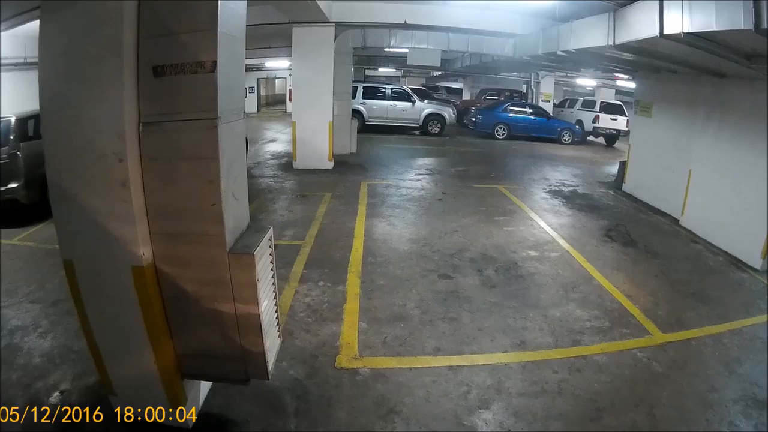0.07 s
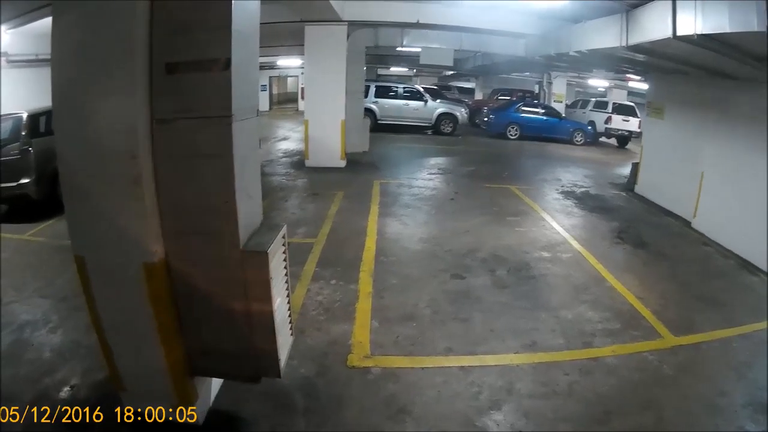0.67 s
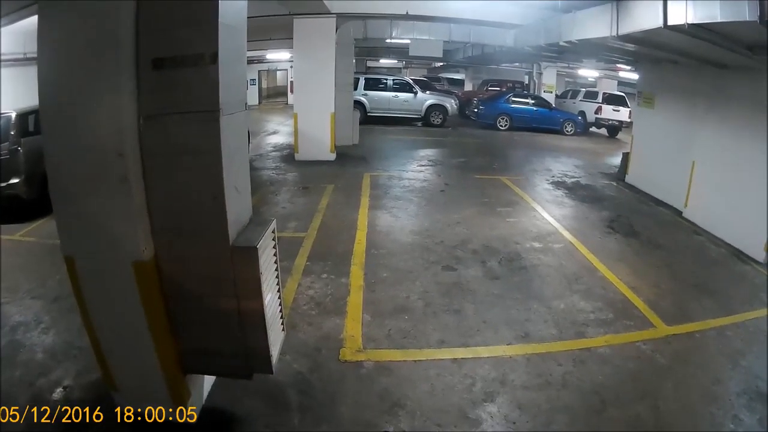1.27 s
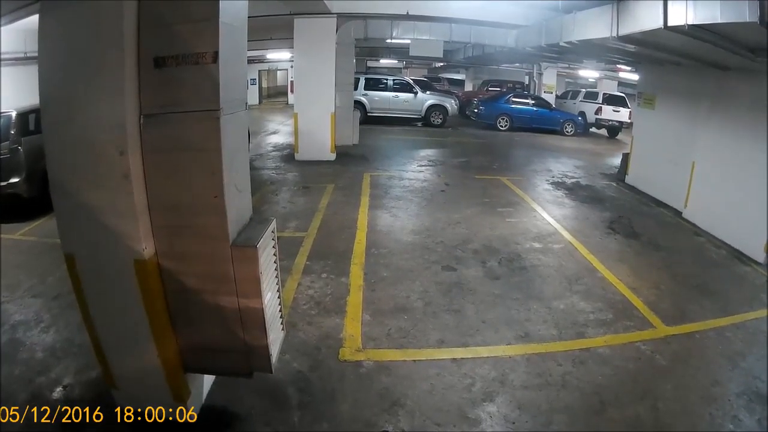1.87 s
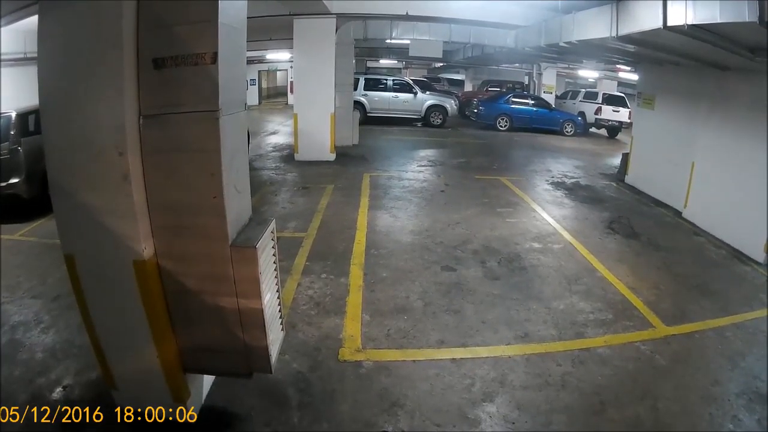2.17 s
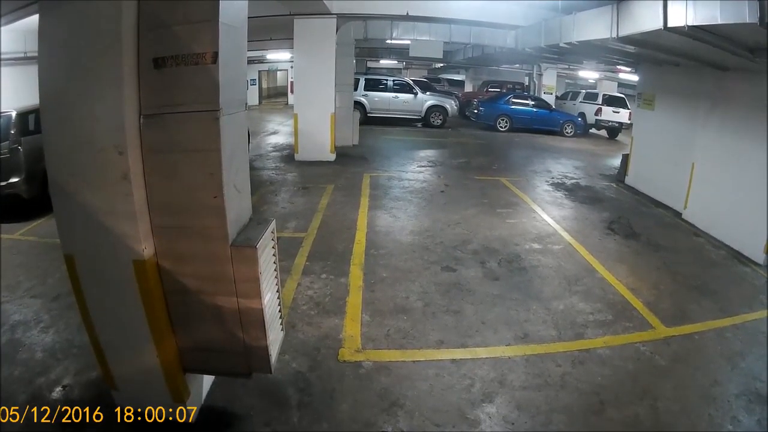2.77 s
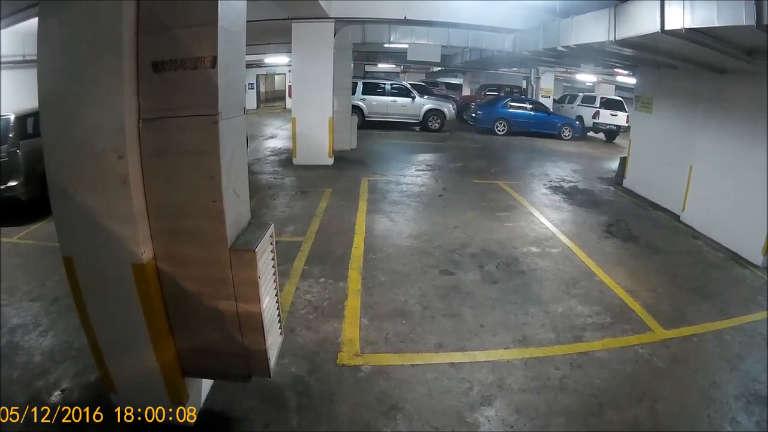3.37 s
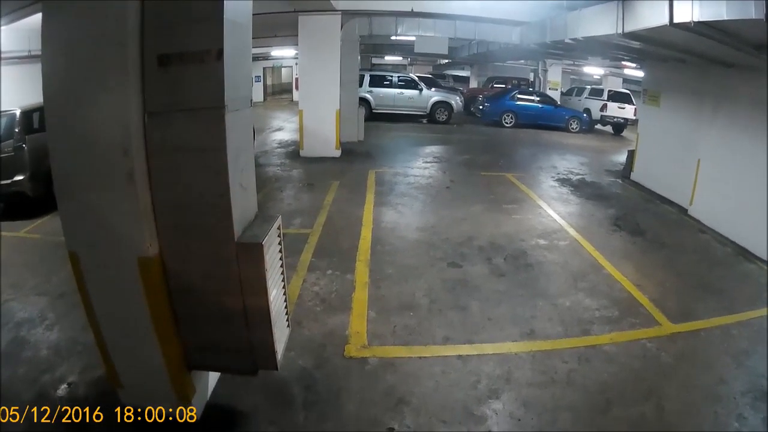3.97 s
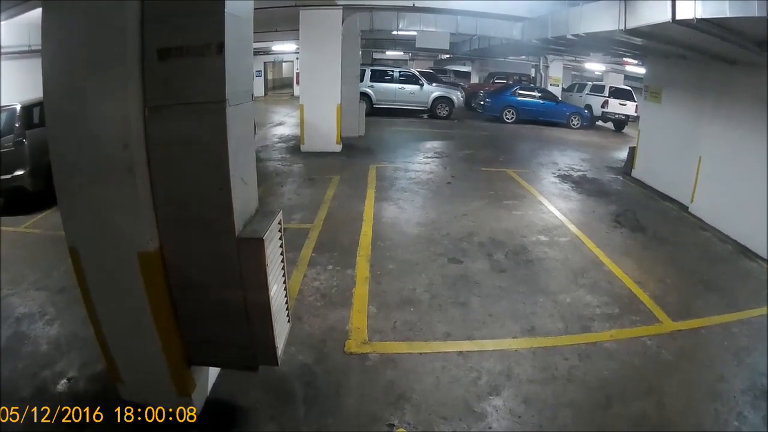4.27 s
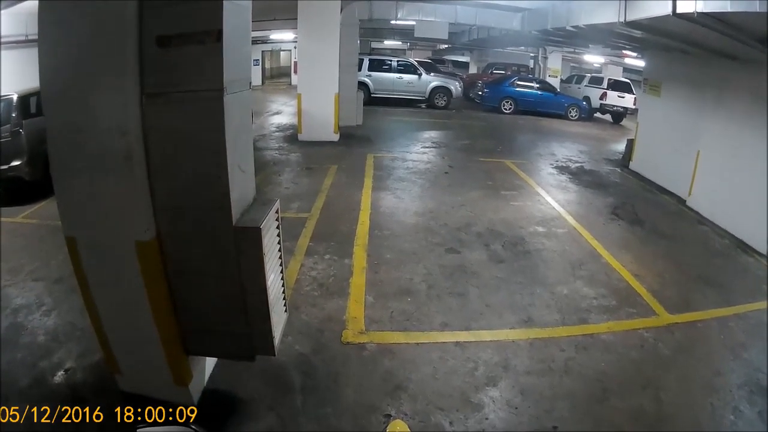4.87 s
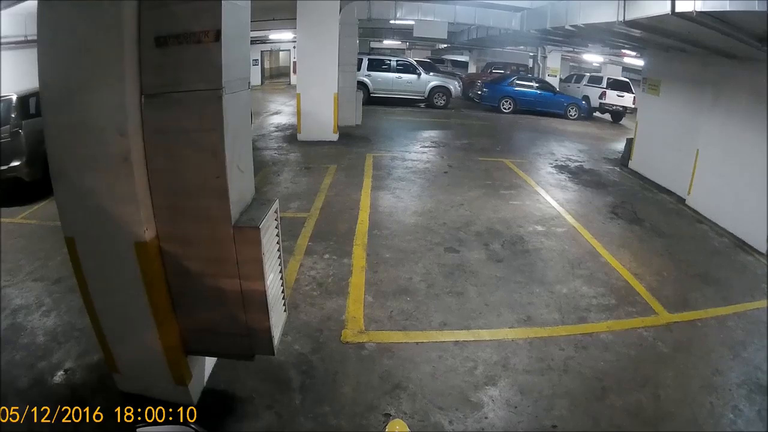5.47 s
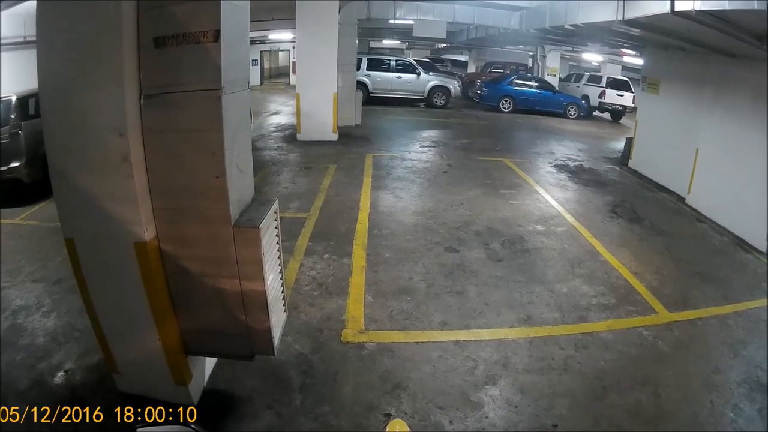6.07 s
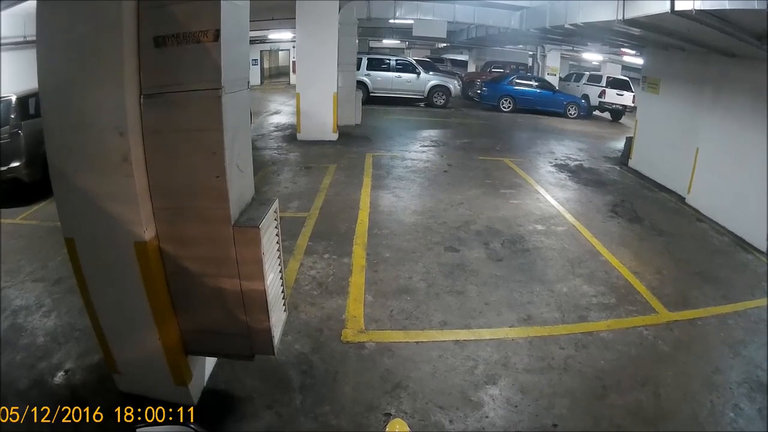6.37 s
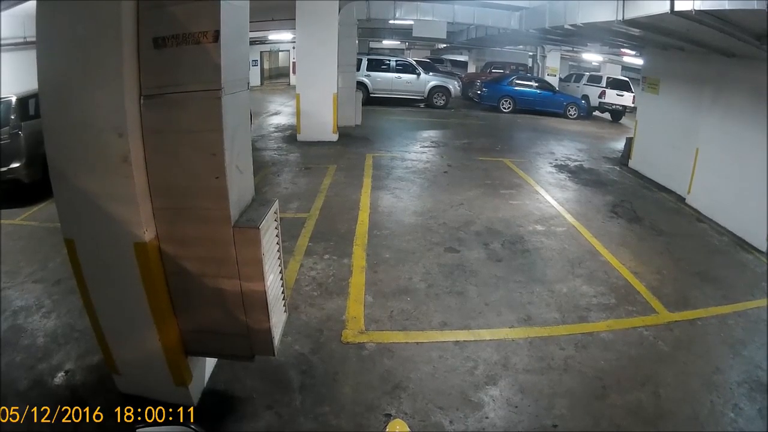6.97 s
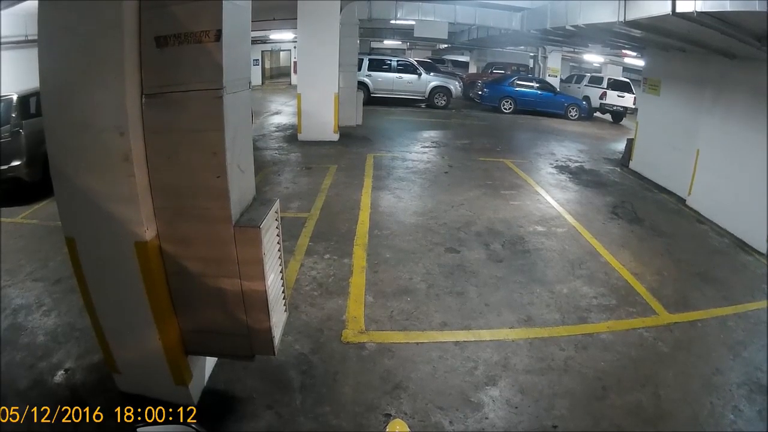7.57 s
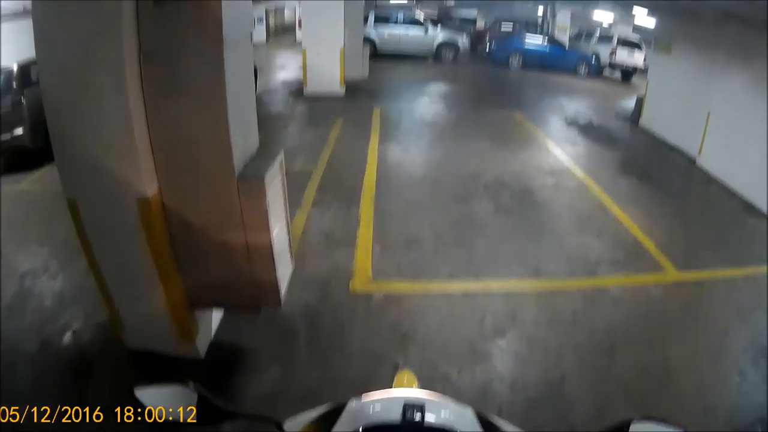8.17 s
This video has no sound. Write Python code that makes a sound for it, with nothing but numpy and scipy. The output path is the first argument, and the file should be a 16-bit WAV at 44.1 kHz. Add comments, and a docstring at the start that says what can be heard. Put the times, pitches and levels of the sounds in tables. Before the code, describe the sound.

A single-cylinder motorcycle runs close to the microphone in a concrete parking garage. Its low thudding slows to an uneven idle, rises in a gentle rev with a raspy bark, then drops back with a soft boom. After more idling, a second, longer rev builds and eases off. Gears whirr and valves chatter faintly, while the long echo smears everything into a rumble.

```python
"""A thudding single-cylinder motorcycle slows to an idle, then is gently revved twice in a concrete garage.
Each firing (one burst of burning fuel) rings the exhaust pipe with a thump and a raspy puff of gas.
The pipe barks and snarls while the throttle is open, and booms after it shuts.
Gears whirr, valves chatter, and a hollow rushing swells three times while the engine lags.
The garage's echo smears the engine into a rumble."""
import sys
import numpy as np
from scipy import signal
from scipy.fft import rfft, irfft
from scipy.io import wavfile

SR = 44100
rng = np.random.default_rng(int(sys.argv[2]) if len(sys.argv) > 2 else 0)


def waveform_to_disk(signal):
    """Save audio, clipped to [-1, 1], as 16-bit WAV at the path in sys.argv[1]."""
    frames = np.transpose(np.atleast_2d(signal))
    scaled = np.clip(frames, -1, 1) * 32767
    samples = np.round(scaled).astype(np.int16)
    wavfile.write(sys.argv[1], SR, samples)


N = 362943
TIME = np.arange(N) / SR


def gain_of(db):
    """Turns decibels (dB) into a number to multiply by."""
    return 10 ** (np.asarray(db) / 20)


def at_pitch(rows, hz):
    """Looks up a pitch in a table, sliding between its rows."""
    pitches, values = np.transpose(rows)
    return np.interp(np.log(hz + 1), np.log(pitches), values)


def coloured(noise, tone):
    """Shapes noise with a tone table, then sets its average strength (rms) to 1."""
    hz = np.fft.rfftfreq(N, 1 / SR)
    shaped = irfft(rfft(noise) * gain_of(at_pitch(tone, hz)), N)
    return shaped / np.sqrt(np.mean(shaped ** 2) + 1e-20)


def clicks(times, db):
    """One click at each of the times, in seconds."""
    out = np.zeros(N)
    out[np.clip(np.round(times * SR).astype(int), 0, N - 1)] = gain_of(db)
    return out


# The background's tone. Each row: pitch in Hz, relative level in dB.
BACKGROUND_TONE = [(20, 30.5), (45, 41.5), (100, 33.5), (300, 35.5), (800, 33.5), (1500, 6), (3000, -1),
                   (15000, -3)]
def background(level_db=-47):
    """A faint, steady low rumble and a thin hiss."""
    return gain_of(level_db) * coloured(rng.standard_normal(N), BACKGROUND_TONE)


# How long the echo lasts. Each row: pitch in Hz, seconds to fade by 60 dB.
ECHO_FADE = [(80, 3), (250, 2.5), (450, 3), (800, 3), (3000, 4)]
# How strong the echo is. Each row: pitch in Hz, level in dB.
ECHO_TONE = [(50, -3), (95, -4), (150, 3), (185, 0.5), (240, 1), (300, -3), (400, 2.5), (600, 1),
             (1000, -3.5)]
# Notes that ring between floor, ceiling and walls. Each row: pitch in Hz, width in Hz, level in dB.
# A narrower note rings longer.
ROOM_NOTES = [(79, 7.4, -8), (88.04, 5.6, -.5), (96.5, 3.6, -5.5), (110.1, 2.4, 0), (117.4, 2.4, 0),
              (123.8, 4.9, 1.5), (151.7, 10, 8), (163.6, 1.1, 4), (190, 2.5, -4.5), (217, 35, -0.5),
              (228.1, 25, -5), (250.7, 5.3, 5.5), (256.2, 2.4, 4), (329, 1.1, 4.5), (342.9, 9.5, 4),
              (383.3, 24, 4.5), (391.1, 5.8, 4.5), (473.2, 4, 9), (543, 2.3, 6), (771, 24, 4)]
def garage(sound, build_s=0.0084):
    """Sound bounces off the concrete and returns as a dense echo with ringing notes."""
    hz, t, bands = signal.stft(rng.standard_normal(2 * SR), SR, nperseg=2048)
    decay = np.log(1000) / at_pitch(ECHO_FADE, hz)[:, None]
    strength = gain_of(at_pitch(ECHO_TONE, hz))[:, None] * np.sqrt(2 * decay / SR)
    echo = signal.istft(bands * strength * np.exp(-decay * t), SR, nperseg=2048)[1][:2 * SR]
    age = TIME[:2 * SR]
    for note_hz, width, db in ROOM_NOTES:
        wave = np.exp(-np.pi * width * age) * np.sin(2 * np.pi * note_hz * age)
        echo += gain_of(db) * 2 * np.pi * width / SR * wave
    echo *= 1 - np.exp(-(age / build_s) ** 2)  # reflections take a moment to gather
    lead_in = sound[:SR // 8][::-1]  # so the garage is already ringing at the start
    return signal.oaconvolve(np.concatenate([lead_in, sound]), echo)[len(lead_in):][:N]


# Swells of rushing. Each row: stop in seconds, seconds taken to grow by swell_db, level it heads for in dB.
RUSHES = [(0.9, 0.83, -43), (3.988, 0.11, -38), (5.064, .8, -34)]
# Their tone. Each row: pitch in Hz, relative level in dB.
RUSH_TONE = [(130, -33), (180, 9.5), (250, -6), (340, 1), (430, -13.5), (575, 1), (680, -9), (790, -0.5),
             (920, -11.5), (1100, -17.5), (1400, -28.5), (2250, -34), (2800, -47), (4500, -65.5)]
def rush(swell_db=16.5, stop_s=0.016):
    """A hollow noise that swells and stops without an echo."""
    level = np.zeros(N)
    for stop, length, db in RUSHES:
        time_left = np.maximum(stop - TIME, 0)
        level += gain_of(db - swell_db * time_left / length) * np.minimum(time_left / stop_s, 1)
    return level * coloured(rng.standard_normal(N), RUSH_TONE)


# The engine's speed. Each row: time in seconds, firings per second.
ENGINE_SPEED = [(0.0, 20.49), (0.17, 19.41), (0.32, 13.09), (0.66, 14.68), (0.86, 8.03), (1.26, 8.97),
                (1.67, 15.15), (1.93, 14.42), (2.22, 16.76), (2.88, 26.16), (3.01, 21.25), (3.78, 8.73),
                (3.91, 9.26), (4.06, 7.27), (4.51, 9.27), (4.98, 8.04), (5.22, 9.66), (5.69, 15.13),
                (5.89, 14.42), (6.55, 15.84), (6.69, 14.35), (6.96, 17.1), (7.16, 16.52), (7.8, 24.11),
                (7.93, 18.85), (8.23, 14.73)]
def firing_rate(times):
    """Firings per second at the given times."""
    return np.interp(times, *np.transpose(ENGINE_SPEED))


def octaves(times, cruise_per_s=15):
    """Engine speed in octaves: 0 is cruising, 1 is twice as fast, -1 is half as fast."""
    return np.log2(firing_rate(times) / cruise_per_s)


def firings(lead_s=0.00815):
    """The times when the exhaust valve opens, just before each engine cycle ends."""
    cycles = np.floor(np.cumsum(firing_rate(TIME)) / SR)
    return TIME[np.diff(cycles, prepend=-1) > 0] - lead_s


# The tones of the gears and of the valves. Each row: pitch in Hz, relative level in dB.
GEAR_TONE = [(120, -34.5), (300, 4.5), (450, -10), (580, -3.5), (680, -2), (780, 5), (900, -1), (1020, -12),
             (1250, -18), (1550, -29.5), (2500, -48.5)]
VALVE_TONE = [(600, -24.5), (1200, -5), (1550, -1), (2200, 0), (2700, -18), (3200, -14.5), (4500, -44)]
# Louder moments. Each row: middle in seconds, half length in seconds, dB added to the valves.
CHATTERS = [(0.037, .15, 0), (2.348, .2, 7.5), (2.95, 0.21, 2), (6.525, 0.2, 7), (7.235, 0.25, 11),
            (7.888, 0.17, 4)]
def gears_and_valves(times, gears_db=-45.5, valves_db=-73, gear_share=0.38, rattle=1.3, rattle_s=.016):
    """Gears whirr and valves chatter, louder with speed; each firing jolts the loose parts."""
    knocks = clicks(times, 2 * np.clip(rng.standard_normal(len(times)), -2, 2))
    jolts = signal.oaconvolve(knocks, np.exp(-TIME[:SR // 8] / rattle_s))[:N]
    gear_noise, valve_noise = (1 + rattle * jolts) * rng.standard_normal((2, N))
    speed = octaves(TIME)
    swell_db = sum(db * np.exp(-((TIME - middle) / half) ** 2) for middle, half, db in CHATTERS)
    whirr = gain_of(gears_db + 5 * speed + gear_share * swell_db) * coloured(gear_noise, GEAR_TONE)
    chatter = gain_of(valves_db + 4 * speed + swell_db) * coloured(valve_noise, VALVE_TONE)
    return whirr + chatter


# Twists of the throttle. Each row: opens in seconds, shuts in seconds, added bark in dB,
# added bite (which lifts rasp, howl and snarl), boom level in dB, share by which the thump's pitch rises.
TWISTS = [(-.3, 0.093, 1, 5, -31, .25), (1.901, 2.815, 5, 3.5, -23, 0.46),
          (5.304, 7.775, 2.5, 2.5, -22, 0.19)]
SHUT_S = 0.04
def throttle(times, part, bend=1.1):
    """The added "bark" or "bite": each twist opens gradually, then snaps shut."""
    column = {"bark": 2, "bite": 3}[part]
    return sum(row[column] * np.interp(times, [row[0], row[1], row[1] + SHUT_S], [0, 1, 0]) ** bend
               for row in TWISTS)


def crest(times, rise_s=.6, bend=2.37):
    """Share by which the thump's pitch rises as the gas pulse shortens late in each twist."""
    return sum(rise * np.interp(times, [shuts - rise_s, shuts, shuts + SHUT_S], [0, 1, 0]) ** bend
               for _, shuts, _, _, _, rise in TWISTS)


# Runs of weak or strong firings. Each row: start and end in seconds, thump change in dB, bark change in dB.
UNEVEN_RUNS = [(-.02, .13, -6.5, -0.5), (.13, .37, 0.5, -4.5), (.46, .52, 2.5, -2.5), (.53, .82, -7, -7.5),
               (.85, .92, 0, 3), (1.08, 1.38, -3, -2.5), (1.76, 1.9, -6, -1.5), (2.03, 2.24, 2, 2),
               (2.36, 2.56, 1.5, 1.5), (2.72, 2.85, -2, 1), (2.86, 2.95, -0.5, -3), (2.96, 3.09, 0, -2),
               (3.1, 3.25, -6.5, -9.5), (3.26, 3.31, 0.5, 0.5), (3.32, 3.68, -4, -3), (3.7, 3.78, 1, 0.5),
               (3.8, 3.9, -14.5, -6), (3.93, 4.0, 1.5, 2.5), (4.04, 4.15, -5.5, -3.5), (4.3, 4.63, 0, -5.5),
               (4.64, 4.85, -12, -9), (4.86, 4.98, -5, -5), (5.0, 5.08, 1, 1.5), (5.22, 5.38, -2.5, -0.5),
               (5.4, 5.63, 0, 1), (5.97, 6.22, 1, 3), (6.36, 6.62, 2.5, 2), (6.63, 6.75, -4, 3),
               (6.76, 7.4, 2.5, 1), (7.45, 7.655, -1.5, 2), (7.91, 7.96, 4.5, -2.5), (7.97, 8.13, -7.5, -7)]
def unevenness(times, part):
    """Change of the "thump" or "bark" in dB while the engine stumbles or catches."""
    column = {"thump": 2, "bark": 3}[part]
    return sum(row[column] * ((times > row[0]) & (times < row[1])) for row in UNEVEN_RUNS)


def effort(times, cruise_db=-22, db_per_octave=3.0, pull_db=9.5, pull_s=0.036):
    """How hard a firing hits, in dB: harder at speed and while speeding up."""
    pull = np.clip(octaves(times + pull_s) - octaves(times - pull_s), -.5, .5)
    return cruise_db + db_per_octave * octaves(times) + pull_db * pull + unevenness(times, "bark")


# The rasp's tone. Each row: pitch in Hz, relative level in dB.
RASP_TONE = [(100, -42), (250, -18.5), (450, 8), (600, -3.5), (900, -9.5), (1250, -20), (1500, -33.5),
             (2200, -31.5), (2800, -46.5), (5000, -75)]
def rasp(times, level_db=-41, growth=0.93, puff_s=0.0089):
    """A puff of swirling gas follows each firing, stronger with throttle and speed."""
    size_db = growth * (effort(times) + throttle(times, "bite")) + 6 * octaves(times)
    age = TIME[:SR // 4] / puff_s
    puffs = signal.oaconvolve(clicks(times, size_db), age * np.exp(-age))[:N]
    return gain_of(level_db) * coloured(puffs * rng.standard_normal(N), RASP_TONE)


def ring(times, db, pitch, notes):
    """At each firing the notes swell, then die away, as through three silencer chambers in a row."""
    t = TIME[:SR // 6]
    pulses = np.zeros((len(times), len(t)))
    for hz, width, note_db in notes:
        age = np.pi * width * t / 2
        swell = (age * np.exp(1 - age)) ** 2
        pulses += gain_of(note_db) * swell * np.sin(2 * np.pi * hz * pitch[:, None] * t)
    starts = np.clip(np.round(times * SR).astype(int), 0, N)
    out = np.zeros(N + len(t))
    for start, pulse in zip(starts, gain_of(db)[:, None] * pulses):
        out[start:start + len(t)] += pulse
    return out[:N]


# The howl's notes. Each row: base pitch in Hz, width in Hz, relative level in dB.
HOWL_NOTES = [(344.5, 55, -2), (523, 80, -3.9)]
def howl(times, pitch, chance_db, base_db=-45, db_per_octave=21):
    """The pipe's upper notes howl, standing out only near top speed."""
    db = base_db + db_per_octave * octaves(times) + throttle(times, "bite")
    return ring(times, db + chance_db, pitch, HOWL_NOTES)


# The snarl's notes. Each row: base pitch in Hz, width in Hz, relative level in dB.
SNARL_NOTES = [(162.4, 16, -14), (383.4, 55, -8), (463.5, 87, -12), (513.3, 60, -24.5)]
def snarl(times, pitch, chance_db, base_db=-2.5, growth=1.091):
    """A harder blow and a faster valve make a sharper pulse, which brings out higher notes."""
    sharpness_db = growth * (effort(times) + throttle(times, "bite")) + 6 * octaves(times)
    return ring(times, base_db + sharpness_db + chance_db, pitch, SNARL_NOTES)


# The boom's notes. Each row: base pitch in Hz, width in Hz, relative level in dB.
BOOM_NOTES = [(62.4, 18, -3.5), (83, 35, -3), (98, 36, -1.5)]
BASS_LAG_S = 0.0038  # boom and thump build just after the bark
def boom(times, pitch, chance_db, fade_db_per_s=27):
    """Once the throttle has shut, the pipe booms, more softly with time."""
    fades = [np.where(times > shuts + SHUT_S, boom_db - fade_db_per_s * (times - shuts), -100)
             for _, shuts, _, _, boom_db, _ in TWISTS]
    db = np.max(fades, axis=0) + unevenness(times, "thump")
    return ring(times + BASS_LAG_S, db + chance_db, pitch, BOOM_NOTES)


# The bark's notes. Each row: base pitch in Hz, width in Hz, relative level in dB.
BARK_NOTES = [(152.2, 55, -10.5), (233.8, 63.6, -2), (350.7, 44, -16.5)]
def bark(times, pitch, chance_db, base_db=3, crest_share=.12):
    """Hard firings and an open throttle make the pipe's middle notes bark."""
    db = base_db + effort(times) + throttle(times, "bark")
    return ring(times, db + chance_db, pitch * (1 + crest_share * crest(times)), BARK_NOTES)


# The thump's notes. Each row: base pitch in Hz, width in Hz, relative level in dB.
THUMP_NOTES = [(66.3, 45, -19.5), (97.34, 39.2, 3.5), (163.7, 13, -23.5)]
def thump(times, pitch, chance_db, base_db=-17.5, db_per_octave=1.84):
    """Every firing thumps the pipe's low notes; an open throttle trades thump for bark."""
    db = base_db + db_per_octave * octaves(times) + unevenness(times, "thump")
    loss_db = 0.76 * throttle(times, "bark") + 7 * crest(times)
    return ring(times + BASS_LAG_S, db - loss_db + chance_db, pitch * (1 + crest(times)), THUMP_NOTES)


def exhaust(times, heat_rise=0.029, pitch_spread=0.018):
    """Each firing rings the pipe and silencer, by chance a little unlike the last."""
    thump_db, bark_db, upper_db, boom_db = 1.2 * rng.standard_normal((len(times), 4)).T
    # hotter gas at speed raises the notes
    pitch = 1 + heat_rise * octaves(times) + pitch_spread * rng.standard_normal(len(times))
    low = thump(times, pitch, thump_db) + boom(times, pitch, boom_db)
    upper = snarl(times, pitch, upper_db) + howl(times, pitch, upper_db)
    return low + bark(times, pitch, bark_db) + upper


def scene(metal_echo_db=-2, rasp_direct_db=-5):
    """The motorcycle close by; its pipe points away, so the rasp arrives mostly off the walls."""
    times = firings()
    pipe, gas, metal = exhaust(times), rasp(times), gears_and_valves(times)
    direct = pipe + gain_of(rasp_direct_db) * gas + metal
    echo = garage(pipe + gas + gain_of(metal_echo_db) * metal)
    return (direct + echo + rush() + background())[None]


def record(dry, low_cut_hz=38, high_cut_hz=15500, fade_s=.004):
    """Takes away the deepest bass, softens both ends and trims the highest treble."""
    thinned = signal.sosfilt(signal.butter(3, low_cut_hz, "high", fs=SR, output="sos"), dry)
    from_end_s = np.minimum(TIME, TIME[::-1])
    fades = np.sin(np.pi / 2 * np.minimum(from_end_s / fade_s, 1)) ** 2
    treble_cut = signal.firwin(255, high_cut_hz, window=("kaiser", 9), fs=SR)
    return signal.oaconvolve(thinned * fades, treble_cut[None], "same")


dry = scene()
out = record(dry)
waveform_to_disk(out)
```